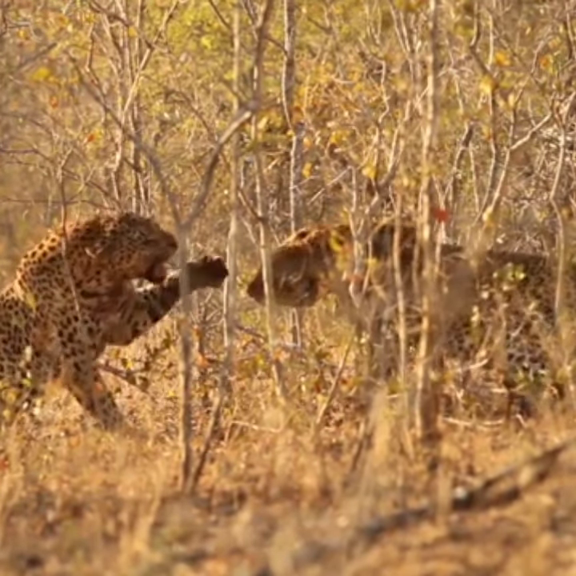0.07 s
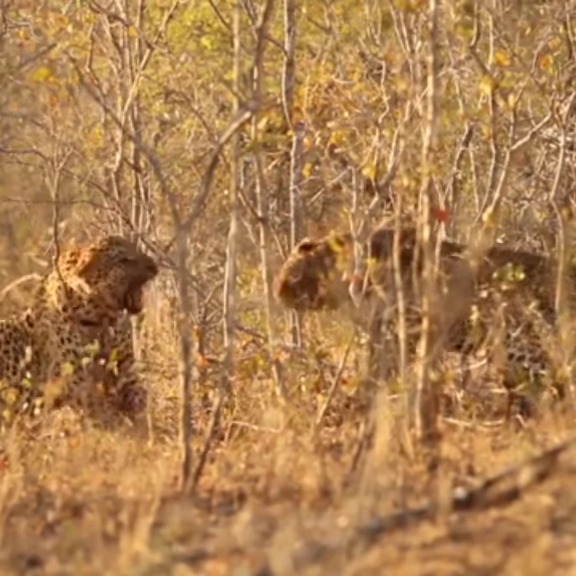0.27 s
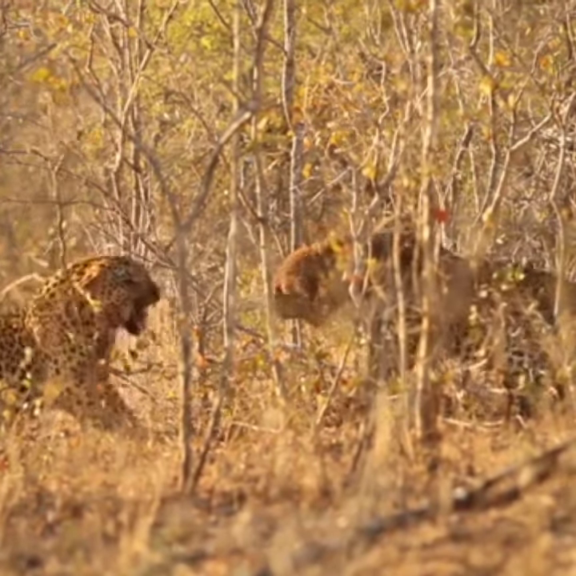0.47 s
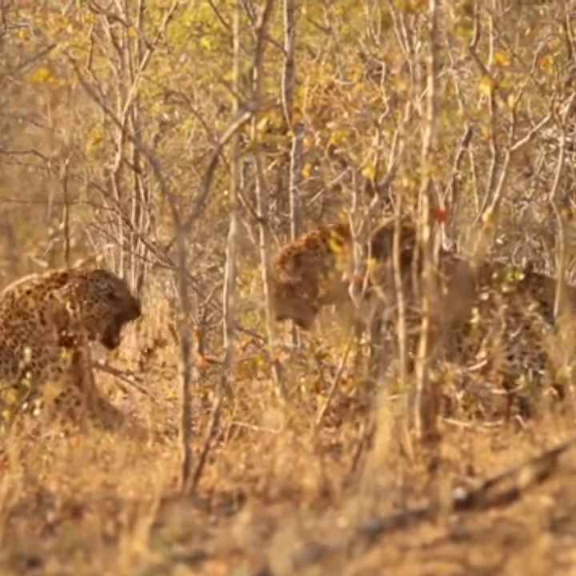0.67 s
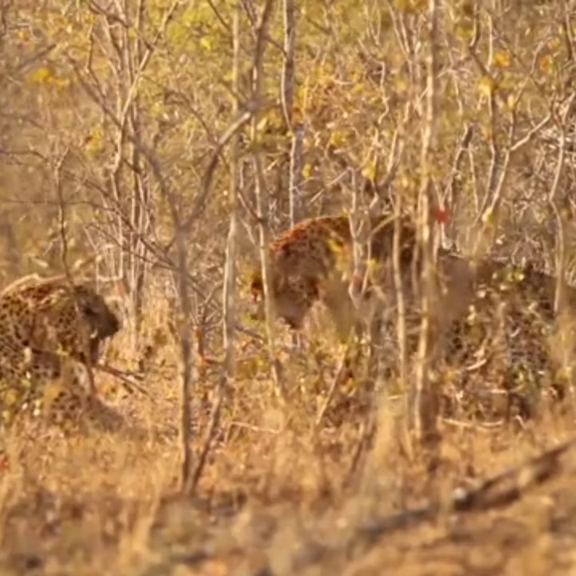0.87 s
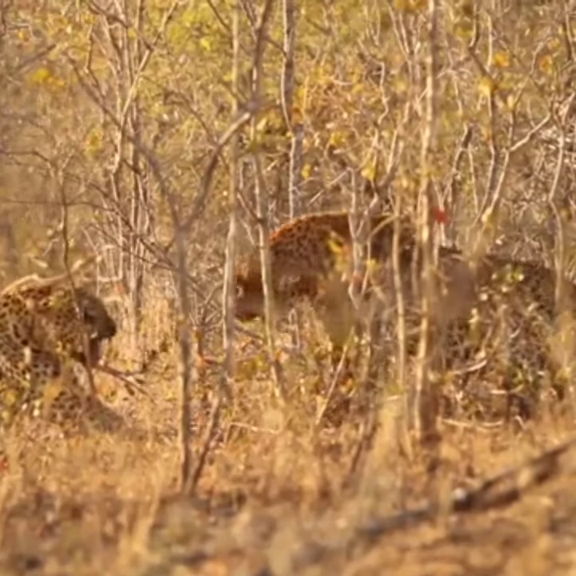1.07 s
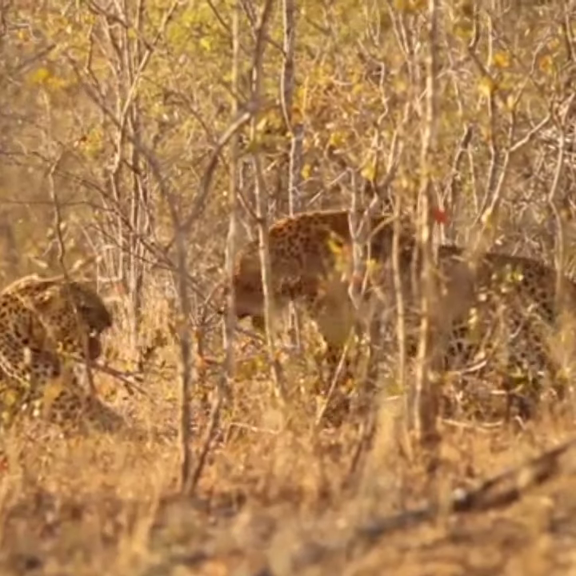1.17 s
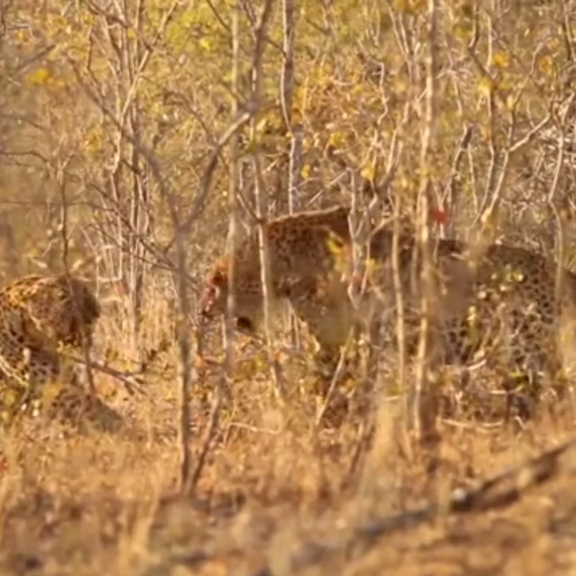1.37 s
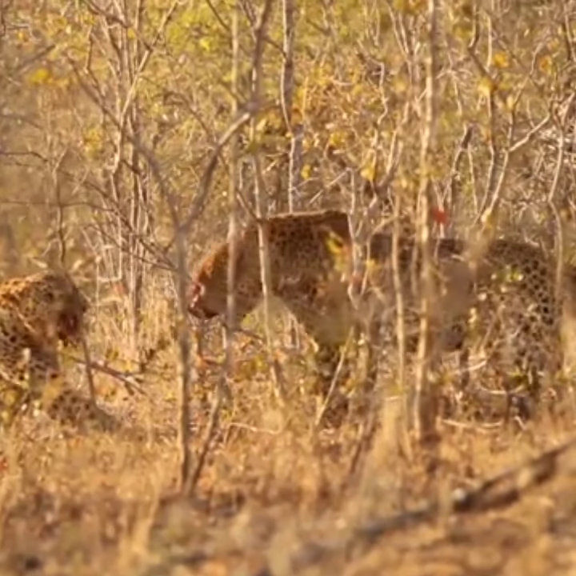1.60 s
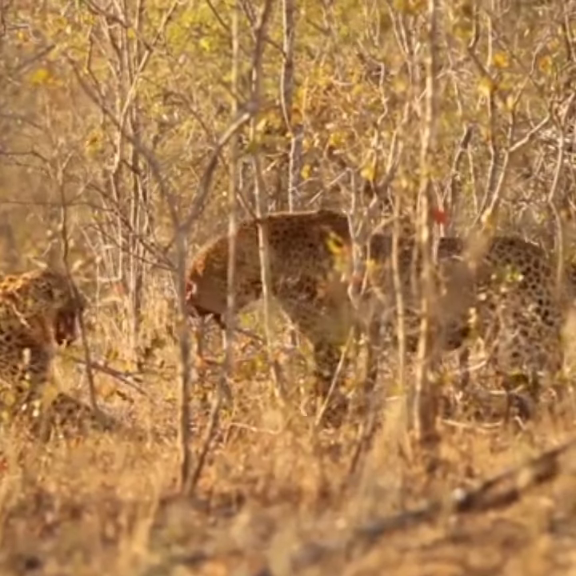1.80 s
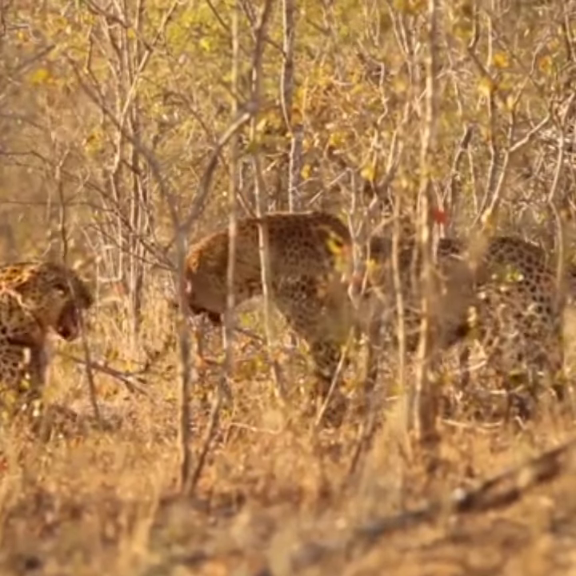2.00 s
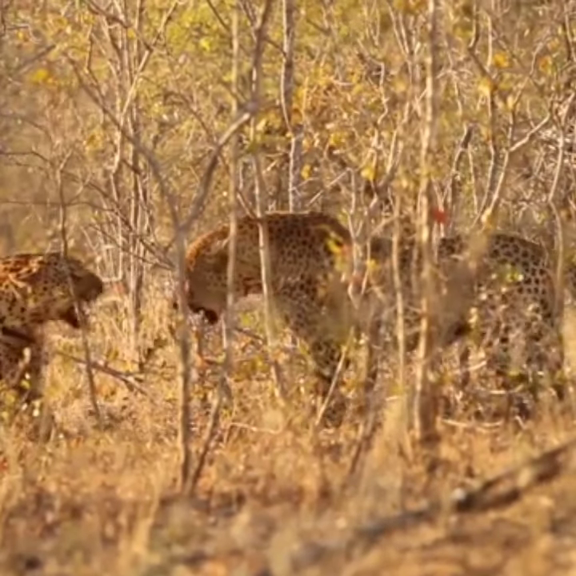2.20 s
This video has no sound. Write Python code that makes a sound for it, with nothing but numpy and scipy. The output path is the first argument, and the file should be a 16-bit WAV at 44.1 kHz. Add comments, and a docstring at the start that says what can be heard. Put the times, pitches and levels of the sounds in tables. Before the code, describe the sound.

A leopard's low rumble speeds into a harsh snarl, then slows to throaty beats. A second leopard answers with a short rattle and a long, raspy growl. Dry grass rustles lightly over faint outdoor air.

```python
"""A leopard's low rumble speeds up into a harsh snarl, then slows to single throat beats. A second leopard,
facing it in dry brush, answers with a short rattle and a long, rattling growl. Each beat of the vocal
folds rings throat and mouth and lets out a rasp of air; deep moans and wet smacks run through the growls.
Dry grass rustles under their paws, and the thicket scatters a short echo over faint open air."""
import sys
import numpy as np
from scipy import signal
from scipy.fft import rfft, irfft, next_fast_len
from scipy.io import wavfile
from scipy.ndimage import uniform_filter1d, map_coordinates

SR = 44100
rng = np.random.default_rng(int(sys.argv[2]) if len(sys.argv) > 2 else 0)


def log_audio(samples):
    """Write samples as a 16-bit WAV file to the path given in sys.argv[1]."""
    # one column per channel
    frames = np.atleast_2d(samples).T
    # limit to full scale, then quantise
    limited = np.clip(frames, -1, 1)
    pcm = np.round(limited * 32767).astype(np.int16)
    wavfile.write(sys.argv[1], SR, pcm)


N = 99225
CLOCK = np.arange(N) / SR
TOP_HZ = 12950


def amp(db):
    return 10 ** (np.asarray(db) / 20)


def unit(x):
    return x / np.sqrt(np.mean(x ** 2) + 1e-20)


def along(points, hz):
    """Read (frequency, value) points on a log frequency axis."""
    knots_hz, values = np.transpose(points)
    return np.interp(np.log(hz + 1), np.log(knots_hz + 1), values)


def at(rows, times):
    """Read each column of an envelope at the given times."""
    knots_s, *columns = np.transpose(rows)
    return [np.interp(times, knots_s, column) for column in columns]


def wobble(rate_hz):
    """A smooth random curve with rate_hz knots a second."""
    return map_coordinates(rng.standard_normal(4096), [CLOCK * rate_hz], mode="wrap")


def band(x, low_hz, high_hz, order=2):
    """A causal band-pass."""
    return signal.sosfilt(signal.butter(order, [low_hz, high_hz], "bandpass", fs=SR, output="sos"), x)


def coloured(x, spectrum, size=4096):
    """Shape x with a minimum-phase EQ of energy 1."""
    cepstrum = irfft(np.log(amp(along(spectrum, np.fft.rfftfreq(size, 1 / SR)))))
    cepstrum[1:size // 2] *= 2
    cepstrum[size // 2 + 1:] = 0
    impulse = irfft(np.exp(rfft(cepstrum)))
    return signal.fftconvolve(x, impulse / np.linalg.norm(impulse))[:N]


# dark tone of the open air (frequency [Hz], relative level [dB])
AIR_EQ = [(20, -23), (40, -5), (140, 0.5), (330, -7), (500, -16), (850, -12), (1400, -27.5), (13000, -43)]
def outdoors(level_db=-40):
    """A faint, low bed of open air."""
    return amp(level_db) * unit(coloured(rng.standard_normal(N), AIR_EQ))


# echo tail (frequency [Hz], time to fall 60 dB [s])
THICKET_DECAY = [(100, 0.39), (1000, 0.12), (10000, 0.076)]
def thicket(x, predelay_s=0.005):
    """Trunks and branches scatter a short, diffuse echo with little bass."""
    send = band(x, 350, TOP_HZ, order=1)
    hz, t, noise = signal.stft(rng.standard_normal(SR // 2), SR, nperseg=256)
    fade = amp(-60 * t / along(THICKET_DECAY, hz)[:, None])
    tail = signal.istft(noise * fade, SR, nperseg=256)[1]
    impulse = np.pad(tail, (int(predelay_s * SR), 0)) / np.linalg.norm(tail)
    return signal.fftconvolve(send, impulse)[:N]


# crisp tone of dry stalks (frequency [Hz], relative level [dB])
GRASS_EQ = [(300, -33), (900, -10.5), (2000, 5), (4000, 1.5), (7000, -2), (10000, -3.5), (13000, -5.5)]
# swells of rustle underfoot (time [s], level [dB])
RUSTLE_LEVEL = [(0, -56.5), (.17, -56.5), (.26, -45), (.3, -39), (.365, -30), (.4, -37), (.5, -38.5),
                (.62, -46), (.78, -45), (.9, -47.5), (1.02, -44.5), (1.2, -55), (1.28, -53), (1.39, -45.5),
                (1.65, -50), (1.72, -41.5), (1.82, -45.5), (1.95, -45.5), (2.12, -51), (2.25, -58)]
def grass(grain_db=1.5, clump_samples=90):
    """Dry stalks crackle in tiny clumps as the cats shift their feet."""
    clumps = amp(grain_db * unit(uniform_filter1d(rng.standard_normal(N), clump_samples)))
    crackle = unit(coloured(clumps * rng.standard_normal(N), GRASS_EQ))
    return amp(at(RUSTLE_LEVEL, CLOCK)[0]) * crackle


# wet clicks in the growls (time [s], pitch [Hz], level [dB])
SMACK_HITS = [(.573, 2680, -24.5), (0.738, 3160, -29.5), (1.374, 4340, -31.5), (1.445, 3500, -35.5),
              (1.504, 2250, -32.5), (1.829, 4070, -31.5), (1.945, 2160, -23.5)]
def smacks(band_ratio=1.14, decay_s=0.0023, spray_db=-15, size=1500):
    """Saliva snaps in the growling mouth: a narrow ring and a little spray."""
    out, t = np.zeros(N), np.arange(size) / SR
    for start_s, hz, db in SMACK_HITS:
        spray = rng.standard_normal(size)
        tone = unit(band(spray, hz / band_ratio, hz * band_ratio))
        smack = (tone + amp(spray_db) * spray) * np.exp(-t / decay_s)
        out[round(start_s * SR):][:size] += amp(db) * smack
    return out


# two sinking moans, one envelope each (time [s], pitch [Hz], level [dB])
MOAN_GLIDES = [
    [(.46, 195, -50), (.56, 178, -35), (.72, 150, -37), (.93, 130, -49)],
    [(1.685, 165, -50), (1.715, 155, -31), (1.98, 130, -32), (2.2, 118, -50)],
]
def moan(glide, waver_hz=11, rough_db=1.5, overtone_db=-15):
    """A deep, rough moan swells and sinks while its two partials flutter."""
    hz, db = at(glide, CLOCK)
    phase = 2 * np.pi * np.cumsum(hz + waver_hz * wobble(rate_hz=140)) / SR
    fundamental = amp(rough_db * wobble(rate_hz=61)) * np.sin(phase)
    overtone = amp(overtone_db + rough_db * wobble(rate_hz=130)) * np.sin(2 * phase)
    gate = (CLOCK > glide[0][0]) & (CLOCK < glide[-1][0])
    return amp(db) * gate * unit(fundamental + overtone)


def beats(rate):
    """Times and periods of the vocal folds' beats along a rate curve."""
    t = np.arange(rate[0][0], rate[-1][0], 1 / SR)
    cycles = np.cumsum(at(rate, t)[0]) / SR
    times = np.interp(np.arange(int(cycles[-1]) + 1), cycles, t)
    return times, 1 / at(rate, times)[0]


def train(times, periods, shapes, db, scatter_db, lead_s=0.001249):
    """Lay one shape on each beat, at its level over one period, lead_s early to offset filter delay."""
    level = amp(db + scatter_db * rng.standard_normal(len(times)))
    gain = level * np.sqrt(periods * SR / np.sum(shapes ** 2, axis=1))
    starts = np.round(np.maximum(times - lead_s, 0) * SR).astype(int)
    samples = starts[:, None] + np.arange(shapes.shape[1])
    return np.bincount(samples.ravel(), (gain[:, None] * shapes).ravel(), N)[:N]


def ring(modes, tuning, waver, attack_s, uneven_db=0.5, size=3000):
    """Each beat rings damped resonances, a little different in pitch and strength every time."""
    t, out = np.arange(size) / SR, 0
    for pitch, width_hz, db in modes:
        detune, strength = rng.standard_normal((2, len(tuning), 1))
        hz = pitch * tuning[:, None] * (1 + waver * detune)
        decay = amp(db + uneven_db * strength) * np.exp(-np.pi * width_hz * t)
        out = out - decay * np.sin(2 * np.pi * hz * t)
    return out * (1 - np.exp(-t / attack_s))


def puffs(count, attack_s, decay_s, leak, leak_s, snap, size=2000):
    """Each beat gives a snap of the folds, a burst of air and a weaker leak after it."""
    t = np.arange(size) / SR
    envelope = (1 - np.exp(-t / attack_s)) * (np.exp(-t / decay_s) + leak * np.exp(-t / leak_s))
    air = rng.standard_normal((count, size)) * envelope
    return air - snap * signal.unit_impulse(size, SR // 1000)


# the growl's body, vowel and bright edge (frequency [Hz], width [Hz], relative level [dB])
GROWL_THROAT_MODES = [(147.6, 43, -1.8), (274, 33, -0.16), (418, 141, -0.39)]
GROWL_MOUTH_MODES = [(865, 70, 0), (808, 36, -5), (960, 45, -7)]
GROWL_UPPER_MODES = [(1690, 23, -3), (2116, 63, 2.5), (2690, 236, 18), (2985, 71, 5), (3630, 130, 5),
                     (4487, 75, 1.5)]
# tone of its breath (frequency [Hz], relative level [dB])
GROWL_RASP_EQ = [(500, -72), (1000, 18.5), (1400, -3), (1680, 8.5), (2100, 9.5), (2700, 0), (3050, 11),
                 (3350, 2), (3700, 3.5), (4700, -3.5), (6000, -5), (13000, -9.5)]
def growl(rate, levels):
    """Slow, separate fold beats rattle through a steady throat and mouth."""
    times, periods = beats(rate)
    throat_db, mouth_db, rasp_db = at(levels, times)
    steady = np.ones(len(times))
    times = times + .00015 * rng.standard_normal(len(times))  # timing jitter
    rings = ring(GROWL_THROAT_MODES, steady, waver=0.082, attack_s=0.0011, uneven_db=3.0)
    throat = band(train(times, periods, rings, throat_db, scatter_db=2.6), 103, 800)
    rings = ring(GROWL_MOUTH_MODES, steady, waver=0.029, attack_s=0.0006)
    mouth = band(train(times, periods, rings, mouth_db, scatter_db=2.5), 740, 1014)
    rings = ring(GROWL_UPPER_MODES, steady, waver=0.023, attack_s=0.0012, uneven_db=6.5)
    upper = band(train(times, periods, rings, rasp_db - 6, scatter_db=3.5), 1270, 6400)
    air = puffs(len(times), attack_s=0.0016, decay_s=0.0045, leak=0.065, leak_s=0.0047, snap=0.63)
    rasp = coloured(train(times, periods, air, rasp_db - 5, scatter_db=2.54), GROWL_RASP_EQ)
    return throat + mouth + upper + rasp


# pulse of the answering cat's folds (time [s], rate [beats/s])
RATTLE_PULSE = [(.55, 37.6), (.78, 36.2)]
GROWL_PULSE = [(1.3275, 43.2), (1.48, 41.2), (1.63, 40.9), (1.75, 43.5), (1.93, 42.1), (2.08, 36.8),
               (2.25, 33.9)]
# its layer faders, before trims (time [s], throat [dB], mouth [dB], rasp [dB])
RATTLE_LEVELS = [(.55, -33.5, -35.5, -41.5), (.68, -31.5, -43.5, -41.5), (.78, -38.5, -46, -45.5)]
GROWL_LEVELS = [(1.328,-29.5,-37.5,-41.5),(1.401,-26.5,-34,-40.5),(1.54,-32.5,-36.5,-40.5),(1.62,-34.5,-30,-41.5),(1.675,-37,-38.5,-40),(1.75,-26,-32,-41),(1.95,-30,-35.5,-39),(2.08,-34.5,-38,-43),(2.25,-40,-57,-46.5)]
def answering_leopard():
    """A short rattle under the fading snarl, then the long growl."""
    return growl(RATTLE_PULSE, RATTLE_LEVELS) + growl(GROWL_PULSE, GROWL_LEVELS)


# pitch waver: firm in the roar, ragged as the effort drops (time [s], base depth [Hz])
RAGGEDNESS = [(.27, 18), (.31, 7), (.43, 9), (.52, 24), (.7, 24), (.82, 8)]
def gliding_tone(times, periods, db, hz, waver, width_hz, attack_s=0.0029, size=3000):
    """A tone glides with the jaw; each beat pushes it anew, so fast beats merge into a roar."""
    t = np.arange(size) / SR
    push = (1 - np.exp(-t / attack_s)) * np.exp(-np.pi * width_hz * t)
    pitch = hz + waver * at(RAGGEDNESS, CLOCK)[0] * wobble(rate_hz=130)
    # merged pushes add up in step, so trim their level
    trim_db = 10 * np.log10(np.minimum(1, periods * SR * np.sum(push ** 2) / np.sum(push) ** 2))
    swell = train(times, periods, np.tile(push, (len(times), 1)), db + trim_db, scatter_db=1.06)
    return swell * np.sqrt(2) * np.sin(2 * np.pi * np.cumsum(pitch) / SR)


# crossfade from teeth to open mouth (time [s], open share [0-1])
MOUTH_OPENING = [(.37, 0), (.415, 1)]
# tone of the breath at either end (frequency [Hz], relative level [dB])
TEETH_RASP_EQ = [(400, -31), (1200, 0), (2900, 0.5), (3550, 4), (4100, -1.5), (4800, 1), (5800, -7),
                 (13000, -18)]
OPEN_RASP_EQ = [(400, -34), (1100, 1.5), (2650, 0.5), (3100, -5), (3600, -5), (4400, -10), (13000, -18.5)]
def snarl_rasp(times, periods, db):
    """Puffs of air hiss through the teeth, then through the open mouth."""
    gape, = at(MOUTH_OPENING, times)
    air = puffs(len(times), attack_s=0.00084, decay_s=0.004, leak=0.06, leak_s=0.0093, snap=1.4)
    open_mouth = train(times, periods, air, db + 10 * np.log10(gape + 1e-3), scatter_db=2.5)
    teeth = train(times, periods, air, db + 10 * np.log10(1 - gape + 0.00074), scatter_db=1.5)
    return coloured(open_mouth, OPEN_RASP_EQ) + coloured(teeth, TEETH_RASP_EQ)


# the moving jaw sweeps the resonances (time [s], throat [Hz], mouth [Hz])
JAW_SWEEP = [(0, 315, 800), (.22, 330, 820), (.285, 258, 790), (.33, 256, 800), (.36, 268, 560),
             (.39, 295, 720), (.407, 305, 820), (.428, 324, 900), (.462, 254, 830), (.51, 254, 810),
             (.72, 285, 820), (.98, 335, 820)]
# resonances riding the throat and mouth sweeps (frequency [x sweep], width [Hz], relative level [dB])
SNARL_OVERTONE_MODES = [(1.3, 109, 16), (1.7, 147, -6)]
SNARL_MOUTH_MODES = [(1, 105, 0), (1.15, 120, -4), (1.52, 100, -12)]
# steady chest weight and bright mouth edge (frequency [Hz], width [Hz], relative level [dB])
CHEST_MODES = [(150, 55, 0)]
SNARL_UPPER_MODES = [(1270, 70, 0), (1750, 100, -2), (1930, 80, -2), (2200, 60, -2), (2630, 110, 0),
                     (3510, 160, -12)]
def snarl(rate, levels, chest_trim_db, chest_cap_db=-33):
    """Fold beats ring a throat and mouth that follow the jaw, over a deep chest tone."""
    times, periods = beats(rate)
    throat_db, mouth_db, rasp_db = at(levels, times)
    throat_hz, mouth_hz = at(JAW_SWEEP, times)
    chest_db = np.minimum(throat_db + chest_trim_db, chest_cap_db)
    steady = np.ones(len(times))
    rings = ring(CHEST_MODES, steady, waver=0.17, attack_s=0.002)
    chest = band(train(times, periods, rings, chest_db, scatter_db=0.5), 100, 320)
    rings = ring(SNARL_OVERTONE_MODES, throat_hz, waver=0.04, attack_s=0.00027)
    overtone = band(train(times, periods, rings, throat_db - 12, scatter_db=3.5), 243, 935)
    rings = ring(SNARL_MOUTH_MODES, mouth_hz, waver=0.055, attack_s=0.0023)
    mouth = band(train(times, periods, rings, mouth_db - 0.5, scatter_db=0.7), 474, 1590)
    rings = ring(SNARL_UPPER_MODES, steady, waver=0.011, attack_s=0.00016, uneven_db=2.0)
    upper = band(train(times, periods, rings, rasp_db - 4.5, scatter_db=5.0), 960, 5900)
    rasp = snarl_rasp(times, periods, rasp_db)
    throat_glide, mouth_glide = at(JAW_SWEEP, CLOCK)
    throat = gliding_tone(times, periods, throat_db, throat_glide, waver=1, width_hz=26.6)
    vowel = gliding_tone(times, periods, mouth_db - 4.5, mouth_glide, waver=2.54, width_hz=60)
    return chest + throat + overtone + vowel + mouth + upper + rasp


# pulse of the lead cat's folds (time [s], rate [beats/s])
SNARL_PULSE = [(0, 45.3), (.14, 45.2), (.22, 55.9), (.35, 62.6), (.45, 92.3), (.5, 55), (.6, 40.8),
               (.72, 34.9), (.98, 21.9)]
GRUMBLE_PULSE = [(1.139, 21.5), (1.3, 21.5)]
# its layer faders, before trims (time [s], throat [dB], mouth [dB], rasp [dB])
SNARL_LEVELS = [(0,-43,-59,-57.5),(.18,-38.5,-52.5,-58.5),(0.22,-29,-37,-38.5),(.268,-24,-33.5,-52.5),(0.285,-20.5,-25,-34.5),(.333,-11.5,-29,-28),(.349,-18.5,-34.5,-47),(.364,-15,-27,-29),(.38,-16,-23.5,-47),(.407,-15.5,-18.5,-36.5),(0.43,-14,-22.5,-24),(.442,-28.5,-37,-29.5),(0.45,-18.5,-31.5,-22),(0.477,-19,-19.5,-30.5),(.55,-29,-34.5,-44.5),(.7,-31.5,-38,-52.5),(.85,-36.5,-51.5,-58.5),(.98,-41.5,-47,-57)]
GRUMBLE_LEVELS = [(1.141, -42.5, -52, -63), (1.2, -38, -50, -62), (1.3, -42, -51, -58)]
def lead_leopard():
    """A rumble races into a snarl and winds down; a few grumbling beats follow."""
    outburst = snarl(SNARL_PULSE, SNARL_LEVELS, chest_trim_db=-0.5)
    grumble = snarl(GRUMBLE_PULSE, GRUMBLE_LEVELS, chest_trim_db=0.5)
    return outburst + grumble


def scene():
    """Both voices and their echo, over grass and open air."""
    cats = lead_leopard() + answering_leopard() + sum(moan(glide) for glide in MOAN_GLIDES) + smacks()
    echo = amp(-7.5) * thicket(cats)
    return (cats + echo + grass() + outdoors())[None]


def record(dry, low_cut_hz=62):
    """The microphone sheds deep bass, and nothing is kept above the band limit."""
    x = signal.sosfilt(signal.butter(3, low_cut_hz, "highpass", fs=SR, output="sos"), dry[0])
    size = next_fast_len(N + SR // 2)
    passband = np.fft.rfftfreq(size, 1 / SR) < TOP_HZ
    return irfft(rfft(x, size) * passband, size)[None, :N]


dry = scene()
out = record(dry)
log_audio(out)
```